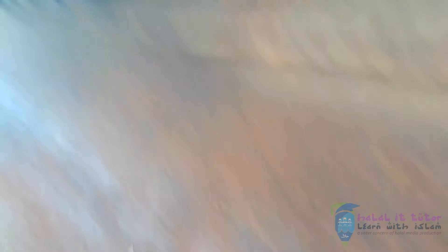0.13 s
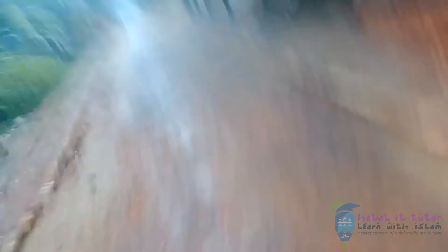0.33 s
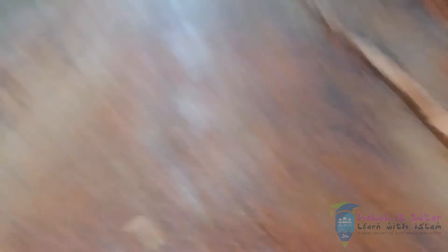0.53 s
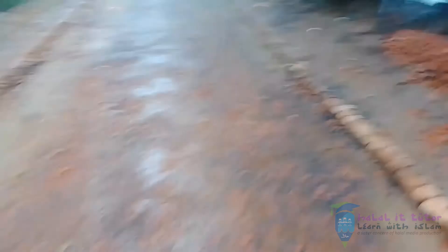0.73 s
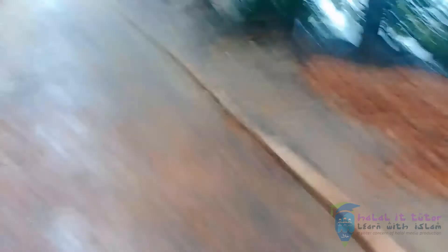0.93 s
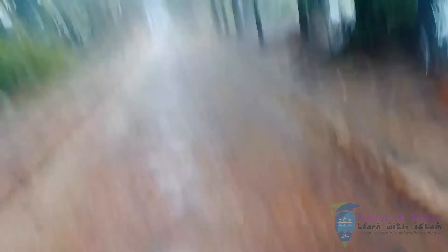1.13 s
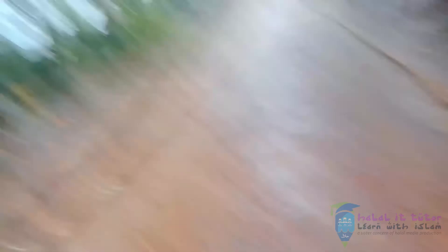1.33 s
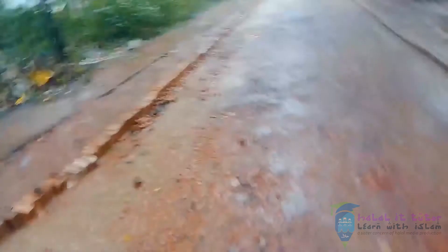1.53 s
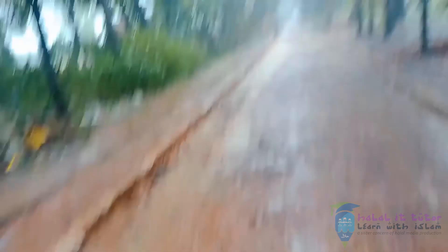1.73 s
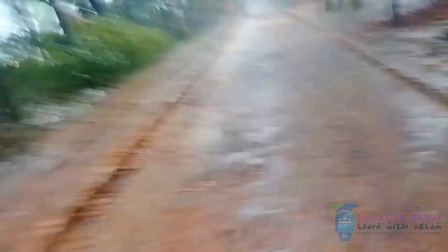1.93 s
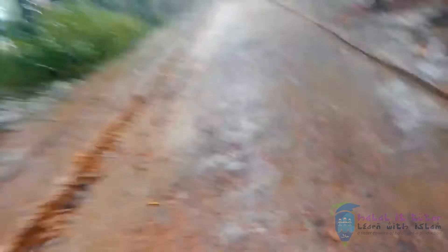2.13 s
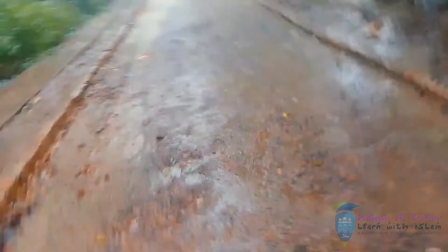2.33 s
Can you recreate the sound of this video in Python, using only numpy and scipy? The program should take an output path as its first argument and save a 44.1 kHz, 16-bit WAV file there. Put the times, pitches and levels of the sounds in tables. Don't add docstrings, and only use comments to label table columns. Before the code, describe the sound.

Rain on stretched umbrella cloth, cutting in suddenly with dull thumps, dense ticks and bright splashes

```python
import sys
import numpy as np
from scipy import signal
from scipy.io import wavfile

SR = 44100
rng = np.random.default_rng(int(sys.argv[2]) if len(sys.argv) > 2 else 0)


def invert_db(level):
    return 10 ** (np.asarray(level, dtype=float) / 20)


def store_wav(level_fs):
    pcm = np.round(np.clip(np.atleast_2d(level_fs), -1, 1) * 32767)
    wavfile.write(sys.argv[1], SR, pcm.T.astype(np.int16))


N = 104340


def rms_one(x):
    return x / np.sqrt(np.mean(x ** 2) + 1e-20)


def drift(rate):
    pole = np.exp(-80 * np.pi * rate / SR)
    noise = rng.standard_normal(N // 40 + 2002)
    slow = signal.lfilter([1], [1, -2 * pole, pole * pole], noise)[2000:]
    return np.interp(np.arange(N) / 40, np.arange(len(slow)), rms_one(slow))


def ring(hits, hz, t60_s):
    pole, turn = invert_db(-60 / (t60_s * SR)), 2 * np.pi * hz / SR
    return signal.lfilter([0, np.sin(turn)], [1, -2 * pole * np.cos(turn), pole * pole], hits + 1e-18)


def band(x, low_hz, high_hz):
    sos = signal.butter(2, [low_hz, min(high_hz, SR / 2.2)], "band", fs=SR, output="sos")
    return signal.sosfilt(sos, x)


def impacts(per_s, spread_db):
    lands = rng.random(N) < per_s / SR
    return lands * invert_db(spread_db * np.minimum(rng.exponential(1, N), 3.3))


def thump(hz):
    skew = 7.5
    snap_s, snap_depth = .00012, .26
    t = np.arange(1, 700) / SR
    u = t * 4 * hz * np.sqrt(skew)
    push = -u ** (skew - 2) * (skew * (skew - 1) - 2 * skew * u + u * u) * np.exp(-u)
    snap = np.exp(-((t - t[np.argmin(push)]) / snap_s) ** 2)
    return push / push.max() - snap_depth * snap


def drops():
    # (time [s], peak level [dB], pitch [Hz])
    cloth_drops = [(0.9068, -18, 630.0), (0.9181, 0.5, 610.0), (0.9418, -7.5, 580.0), (0.9842, -3.5, 653),
                   (1.0107, -4, 630), (1.0708, -5, 460), (1.123, -8, 540.0), (1.2642, -5, 417), (1.3576, -3, 584),
                   (1.4295, -5, 510), (1.5841, -5, 434), (1.63, -5.5, 480), (1.71, -5, 765), (1.7612, -15, 500),
                   (1.7859, -7.3, 500.0), (1.791, -8, 630.0), (1.8518, -6.5, 460), (1.8612, -4, 574),
                   (1.9778, -10.5, 540.0), (1.9808, -12.5, 610.0), (1.9989, -6, 510.0), (2.1305, -8, 480),
                   (2.1511, -5.5, 630), (2.1714, -9.5, 540.0), (2.178, -5, 680), (2.1876, -1.5, 646),
                   (2.201, -4.5, 880.0), (2.2709, -7.5, 477), (2.2804, -5.5, 726), (2.3144, -8.5, 610),
                   (0.976, -9.5, 467), (1.2008, -10.5, 570), (1.3643, -10.5, 547), (1.4341, -11, 410),
                (1.4824, -32, 860), (1.6829, -8.5, 850.0), (1.6982, -15, 460), (1.8145, -20, 670.0),
                (1.8292, -13.5, 570.0), (1.8548, -15, 680), (1.9082, -14, 356), (1.9197, -11, 523),
                (1.954, -29, 840), (1.9689, -7.5, 1110), (2.0251, -11.5, 597), (2.0545, -9, 960.0),
                (2.069, -14, 830), (2.0842, -16, 437), (2.0976, -12.3, 420.0), (2.1148, -10.5, 500.0),
                (2.1211, -13, 380.0), (2.1346, -14.5, 410.0), (2.1406, -15.5, 420.0), (2.1573, -10.6, 534),
                (2.163, -13.5, 250.0), (2.1906, -10.5, 630.0), (2.1944, -17, 570.0), (2.1978, -7.5, 610.0),
                (2.321, -15, 650.0), (2.3481, -14, 403),
                   (.8868, -12.5, 596), (1.2422, -13.5, 513), (1.2473, -20.5, 597), (1.3461, -19, 500),
             (1.3732, -2.5, 630), (1.531, -17, 794), (1.6615, -8, 1100), (1.758, -6.5, 700),
             (1.7942, -7, 814), (1.881, -13, 597), (2.3022, -8.5, 700), (2.355, -9, 900)]
    ring_hz, ring_t60_s, ring_db = 2200, .01, -13
    sag_hz, sag_t60_s, sag_db = 185, .047, -25.5
    thumps, hits = np.zeros(N + 700), np.zeros(N)
    for s, db, hz in cloth_drops:
        shape = thump(hz)
        start = int(s * SR) - np.argmax(shape)
        thumps[start:start + len(shape)] += invert_db(db) * shape
        hits[start + np.argmin(shape)] = invert_db(db)
    cloth_ring = invert_db(ring_db) * ring(hits, ring_hz, ring_t60_s)
    sag = invert_db(sag_db) * ring(hits, sag_hz, sag_t60_s)
    return thumps[:N] + cloth_ring + sag


def patter():
    per_s, spread_db, level_db = 250, 6, -30.5
    hits = impacts(per_s, spread_db)
    size = rng.integers(0, 8, N)
    total = np.zeros(N)
    for k, hz in enumerate(np.geomspace(300, 1100, 8)):
        total += signal.fftconvolve(hits * (size == k), thump(hz))[:N]
    return invert_db(level_db) * rms_one(total)


def ticks():
    # (time [s], level [dB])
    shower = [
        (.87, -1),
        (1.3, 0.5),
        (1.6, -1),
        (1.75, 2),
        (2.1, 3),
        (2.25, -3),
        (2.36, 1),
    ]
    per_s, spread_db, level_db = 900, 3, -28
    cycles, main_hz = 6.4, 2150
    hits = impacts(per_s, spread_db) * rng.choice([-1, 1], N)
    hits = hits * invert_db(np.interp(np.arange(N) / SR, *np.transpose(shower)))
    panel = rng.integers(0, 14, N)
    total = np.zeros(N)
    for k, hz in enumerate(np.geomspace(1700, 3900, 14)):
        fainter = invert_db(-6.0 * abs(np.log2(hz / main_hz)))
        total += fainter * ring(hits * (panel == k), hz, cycles / hz)
    return invert_db(level_db) * rms_one(band(total, 940, 5200))


def spatters():
    # (time [s], peak level [dB], centre [Hz], length [s])
    near_bursts = [(.9078, -9, 11000, .001), (.9096, -2.5, 10500, .0016), (1.002, -16, 11500, .003),
                   (1.116, -14, 9000, .003), (1.148, -15, 12000, .003), (1.2066, -7, 9000, .002),
                   (1.2068, -15, 3500, .003), (1.2086, -2.5, 12000, .0025), (1.682, -8, 3000, .002),
                   (1.696, -8, 9000, .0015), (1.72, -11, 10500, .002), (1.736, -12, 9400, .003),
                   (1.849, -8, 8200, .003), (1.858, -14, 11000, .002), (2.027, -14, 12000, .003),
                   (2.062, -13, 9000, .002), (2.097, -14, 11000, .003), (2.2562, -2, 13000, .002),
                   (2.2564, -13, 6000, .002), (2.258, -10, 10000, .0015), (2.2905, -14, 12200, .002),
                   (2.317, -15, 12000, .002), (2.3245, -7.5, 11000, .003), (2.361, -13, 11000, .003)]
    out, t = np.zeros(N + 600), np.arange(600) / SR
    for s, db, hz, length_s in near_bursts:
        grit = rng.standard_normal(600) * rng.exponential(1, 600)
        envelope = (t / length_s) ** .1 * np.exp(-(t / length_s) ** 1.5)
        burst = band(grit, hz * .65, hz * 1.4) * envelope
        start = int(s * SR - 20)
        out[start:start + 600] += invert_db(db) * burst / np.abs(burst).max()
    return out[:N]


def fizz():
    per_s, spread_db, level_db, decay_s = 150, 2.5, -37, .002
    decay = np.exp(-1 / (decay_s * SR))
    total = np.zeros(N)
    for hz in (6500, 9500, 12500):
        spray = band(rng.standard_normal(N), hz / 1.14, hz * 1.3)
        total += spray * signal.lfilter([1], [1, -decay], impacts(per_s / 3, spread_db))
    return invert_db(level_db) * rms_one(total)


def far_rain():
    # (frequency [Hz], level per Hz [dB])
    hiss = [(40, -14), (150, -9), (500, -2), (1200, -5.5), (2100, -3.5), (4200, -14.5), (10000, -15),
            (15500, -18)]
    level_db, patchy_db = -22, 1.5
    hz_points, db_points = np.transpose(hiss)
    edges = 30 * 2 ** np.arange(0, 9.6, .5)
    together = drift(10.5)
    white = rng.standard_normal((2, N))
    total = np.zeros(N)
    for k, (low, high) in enumerate(zip(edges, edges[1:])):
        db = np.interp(np.log(low * high) / 2, np.log(hz_points), db_points)
        flicker = 0.13 * together + drift(10.5)
        total += invert_db(db + patchy_db * flicker) * band(white[k % 2], low, high)
    return invert_db(level_db) * rms_one(total)


def scene():
    # (time [s], level [dB])
    gain = [(.87, -1), (1.03, 0), (1.154, 0), (1.16, -7.5), (1.23, -8), (1.28, -1), (1.41, 0), (1.49, 1),
            (1.58, -0.5), (1.66, 2), (1.74, 2), (1.88, 1.5), (1.96, 0), (2.06, 1.5), (2.201, 2),
            (2.217, -3.5), (2.288, -2), (2.36, 3)]
    treble_from_hz, treble_extra_swing = 3500, .2
    gain_db = np.interp(np.arange(N) / SR, *np.transpose(gain))
    steady = far_rain() + patter() + ticks() + fizz()
    high_pass = signal.butter(2, treble_from_hz, "high", fs=SR, output="sos")
    treble = signal.sosfiltfilt(high_pass, steady)
    steady = steady + (invert_db(treble_extra_swing * gain_db) - 1) * treble
    return (invert_db(gain_db) * steady + drops() + spatters())[None]


def low_pass(x):
    return signal.sosfilt(signal.butter(12, 16810, fs=SR, output="sos"), x)


def record(dry):
    mic_low_hz, cutoff_hz = 65, 16000
    start_s, fade_in_s = .8708, .001
    offset, offset_from_s, offset_full_s, offset_step = .0078, .13, .38, .0019
    t = np.arange(N) / SR
    x = signal.sosfilt(signal.butter(2, mic_low_hz, "high", fs=SR, output="sos"), dry)
    rounded = np.sign(x) * (.7 + .28 * np.tanh((abs(x) - .7) / .28))
    x = np.where(abs(x) < .7, x, rounded)
    x = signal.sosfilt(signal.cheby2(14, 60, cutoff_hz, fs=SR, output="sos"), x)
    x = x * np.clip((t - start_s) / fade_in_s, 0, 1)
    creep = offset * np.interp(t, [offset_from_s, offset_full_s, start_s, start_s + .03], [0, 1, 1, 0])
    stairs = offset_step * np.ceil(creep / offset_step / 2) * 2
    x = x + .85 * creep + .15 * stairs
    return low_pass(x)


dry = scene()
out = record(dry)
store_wav(out)
```